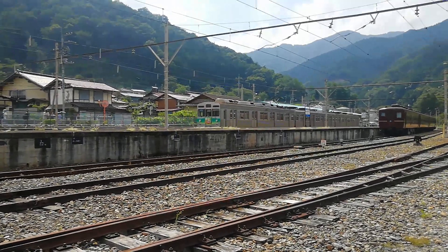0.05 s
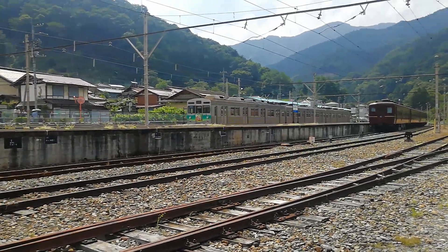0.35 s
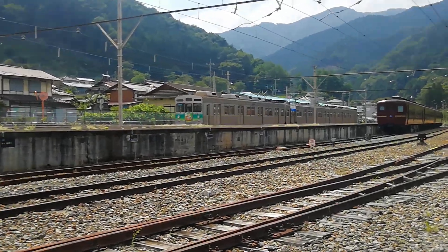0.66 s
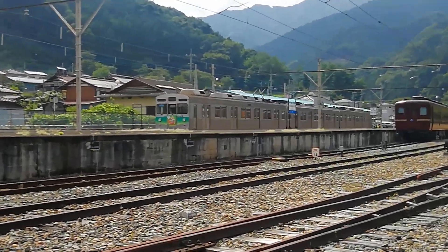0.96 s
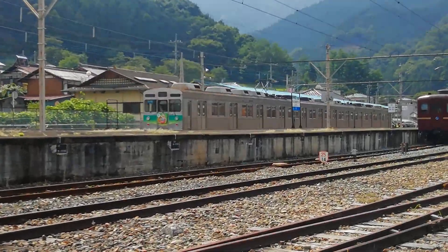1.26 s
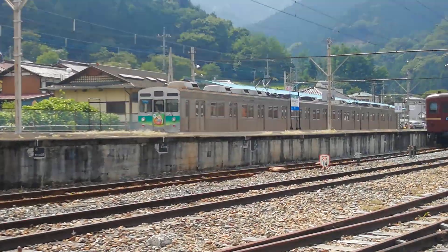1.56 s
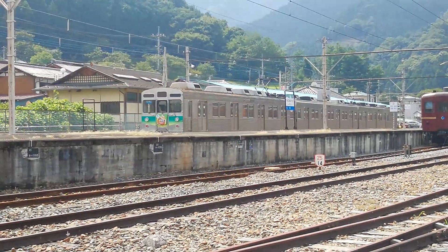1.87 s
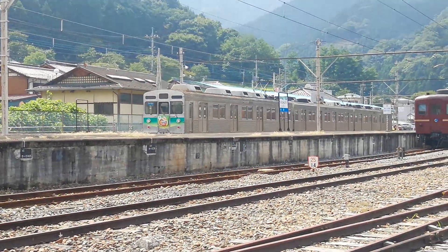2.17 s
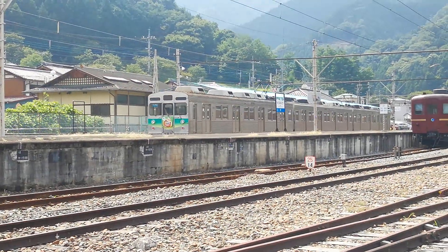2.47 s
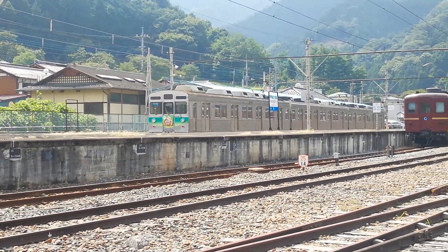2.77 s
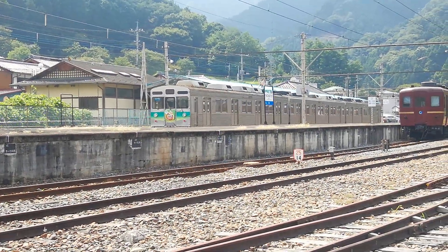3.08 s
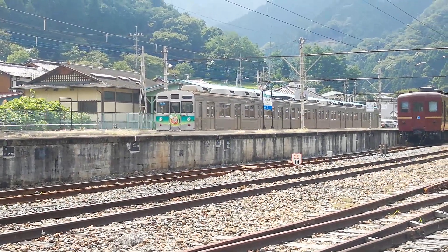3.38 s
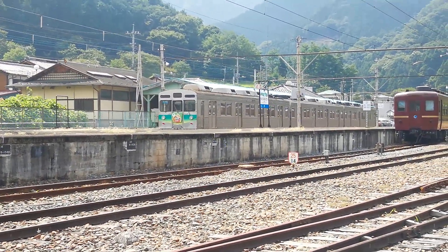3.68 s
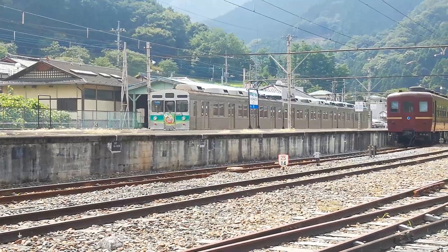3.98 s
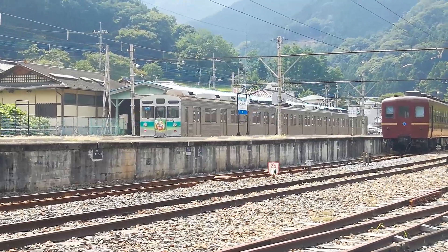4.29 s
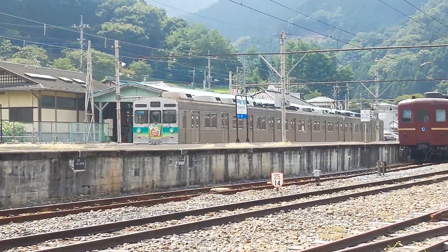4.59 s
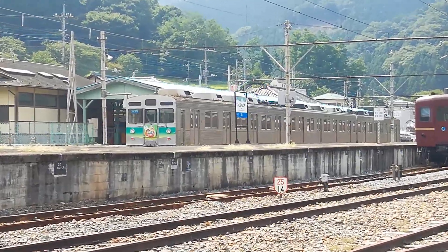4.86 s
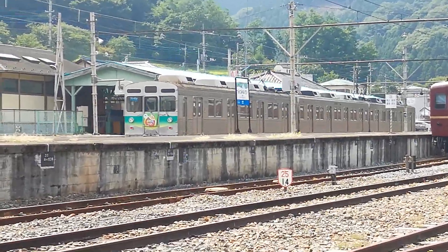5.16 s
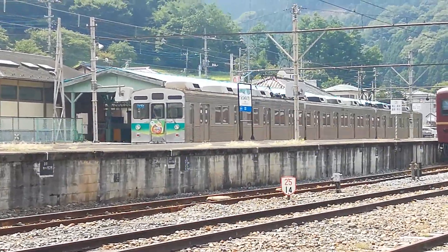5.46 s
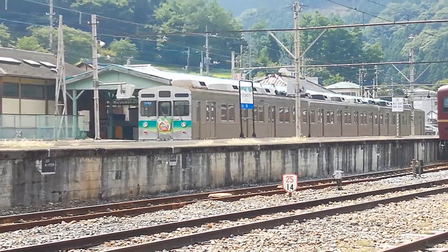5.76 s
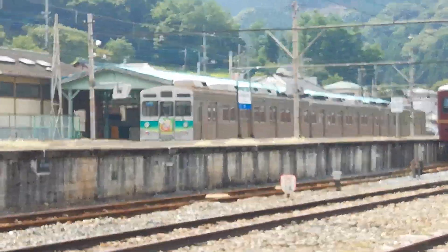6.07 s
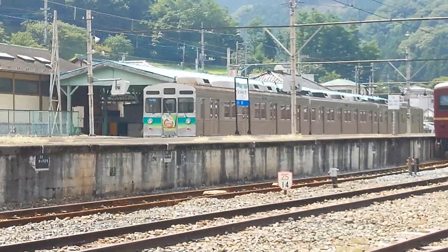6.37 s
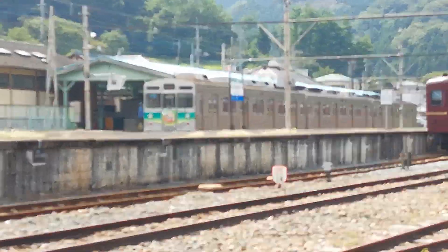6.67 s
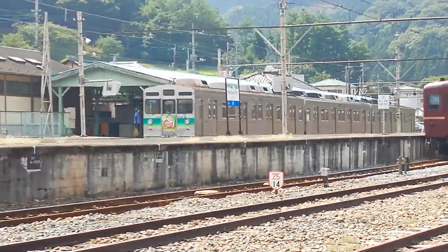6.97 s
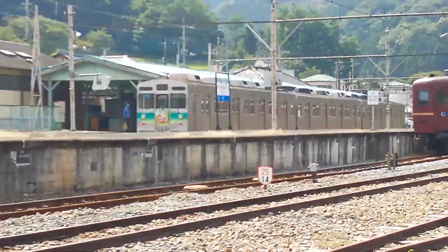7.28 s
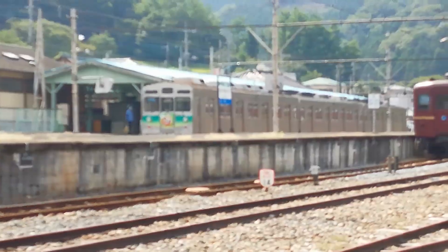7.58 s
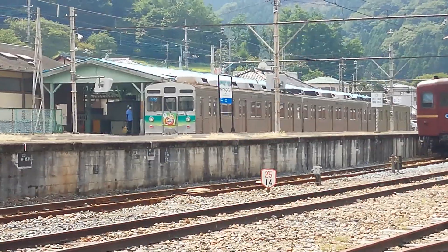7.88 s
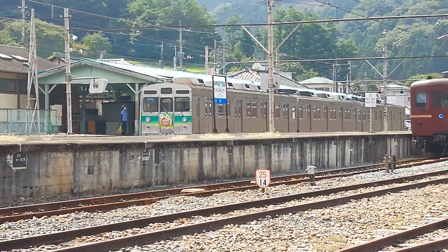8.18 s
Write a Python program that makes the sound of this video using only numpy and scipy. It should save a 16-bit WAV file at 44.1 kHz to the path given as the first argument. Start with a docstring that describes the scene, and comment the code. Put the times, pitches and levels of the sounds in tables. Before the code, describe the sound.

An electric train idles at a country platform, heard from across the tracks. Its deep, steady hum dominates, with a soft whir, a thin whine and rushing cooling air. Faint cicadas buzz and call in short phrases from the trees. A light breeze rumble dies down while three tiny ticks sound close by, followed by one dry click of a stone. The whine and high insect shimmer grow slightly toward the end.

```python
"""An electric train idles across the tracks at a country platform on a summer day. From the start its
motor-generator hums and whirs over rushing cooling air, a low drone swells and sinks, and cicadas click
their tymbals into song in the trees. A soft scuff comes at 1 s, then three tiny close ticks at 1.3, 3.7
and 5.2 s, while the breeze and its rumble die down. At 6 s a stone shifts in the ballast. Toward the end
a whine stands out more, a high insect chorus grows and, at 8.1 s, something rustles faintly."""
import sys
import numpy as np
from scipy import signal
from scipy.fft import rfft, irfft
from scipy.io import wavfile

SR = 44100
rng = np.random.default_rng(int(sys.argv[2]) if len(sys.argv) > 2 else 0)


def store_wav(level_fs):
    """Save 16-bit WAV to argv[1]."""
    pcm = np.round(np.clip(np.atleast_2d(level_fs), -1, 1) * 32767)
    wavfile.write(sys.argv[1], SR, pcm.T.astype(np.int16))


N = 372204
TIME = np.arange(N) / SR
BINS = np.maximum(np.fft.rfftfreq(N, 1 / SR), 1)
SPLIT = np.array([[.5], [-.5]])   # shares a left-right difference between the channels


def from_db(db):
    """Decibels to gain."""
    return 10 ** (np.asarray(db) / 20)


def in_time(rows):
    """An automation curve at every sample."""
    return np.interp(TIME, *np.transpose(rows))


def at_hz(points, hz, edge_db=0):
    """The columns of a spectrum on a log-frequency axis, falling by edge_db an octave past its ends."""
    known, *columns = np.transpose(points)
    octave, known = np.log2(hz), np.log2(known)
    outside = np.abs(octave - np.clip(octave, known[0], known[-1]))
    return np.array([np.interp(octave, known, c) - edge_db * outside for c in columns])


def rms_one(x):
    """Scale to unit rms."""
    return x / np.sqrt(np.mean(x ** 2) + 1e-20)


def drift(rate_hz):
    """Random wander of spread 1, smooth above rate_hz."""
    return rms_one(irfft(rfft(rng.standard_normal(N)) / (1 + (BINS / rate_hz) ** 4), N))


def shifted(wander):
    """The same wander from a random starting point."""
    return np.roll(wander, rng.integers(N))


def phase_of(hz):
    """Running phase of a moving pitch, in radians."""
    return 2 * np.pi * np.cumsum(hz) / SR


def pan(left_db):
    """Channel gains that put the left left_db above the right."""
    return from_db(SPLIT * left_db)


def swell(start, length):
    """A half-sine fade in and out."""
    return np.sin(np.pi * np.clip((TIME - start) / length, 0, 1))


def struck(modes):
    """The short ring after one touch, from modes (frequency [Hz], gain, t60 [s])."""
    age = np.arange(SR // 50) / SR
    return sum((-1) ** k * gain * from_db(-60 * age / t60) * np.sin(2 * np.pi * hz * age)
               for k, (hz, gain, t60) in enumerate(modes))


def add(out, s, sound):
    """Mix a short sound in at a given time."""
    at = round(s * SR)
    out[..., at:at + sound.shape[-1]] += sound


# Stereo image of the open air: (frequency [Hz], likeness of the channels [0-1])
AIR_LIKENESS = [(60, 1), (140, 0.9), (210, 1), (330, 0.72), (500, 0.13), (800, 0.08), (1200, 0.5),
                (1800, 0), (16000, 0)]
def open_air(density_db):
    """Diffuse noise: near mono in the bass, fully wide in the treble."""
    mid, side = rfft(rng.standard_normal((2, N))) * np.sqrt(SR) / 2
    alike = at_hz(AIR_LIKENESS, BINS)
    stereo = np.sqrt(1 + alike) * mid + np.sqrt(1 - alike) * side * [[1], [-1]]
    return irfft(stereo * from_db(density_db), N)


# Hiss bed before trim: (frequency [Hz], left density [dB/Hz], right density [dB/Hz])
HILLSIDE_EQ = [(3080, -99, -93.5), (3200, -99.5, -100), (3990, -92, -96.5), (4660, -91, -89),
               (4980, -93, -88), (5400, -97, -92), (5600, -98.5, -97), (6940, -95, -93.5),
               (7900, -103, -101), (9600, -110, -109), (12000, -112, -110), (12800, -111, -105),
               (13700, -107, -101), (15500, -106, -99.5)]
def hillside(trim_db=.66, flutter_db=.67):
    """A wooded hillside full of far insects blurs into a fluttering hiss."""
    return from_db(trim_db + flutter_db * drift(6.3)) * open_air(at_hz(HILLSIDE_EQ, BINS, edge_db=7))


# Fader of the insect chorus, slowly rising: (time [s], level [dB])
CHORUS_FADER = [(0, -71.5), (1.6, -73), (3.2, -70.5), (5.0, -71), (6.9, -68.5), (8.44, -66.5)]
# Its colour: (frequency [Hz], relative level [dB])
CHORUS_EQ = [(7000, 3), (8100, -1), (9500, -14), (11800, -8), (13000, -12), (14000, 4.5), (15000, -12)]
def far_chorus(left_db=-9, shimmer_db=2.5):
    """Many small insects merge into a high shimmer on the right."""
    level = from_db(in_time(CHORUS_FADER) + shimmer_db * drift(26))
    return level * pan(left_db) * rms_one(open_air(at_hz(CHORUS_EQ, BINS, edge_db=40)))


# Band-noise swells: (start [s], length [s], centre [Hz], width [octaves], peak level [dB])
SWELL_CUES = [(1.058, .03, 800, .9, -53.5), (1.08, .065, 700, .95, -54.5), (5.0, 5, 1450, .35, -64.5),
              (8.1, .5, 1650, .42, -57.7), (-.6, 1.8, 850, .3, -64)]
def noise_swells():
    """The train's airy rush swells softly, lower-pitched at the start and higher from 5 s;
    short swells make a double scuff at 1 s and a faint rustle at 8.1 s."""
    out = 0
    for start, length, hz, width, db in SWELL_CUES:
        band_db = -5 * (np.log2(BINS / hz) / width) ** 2
        out += from_db(db) * swell(start, length) * rms_one(open_air(band_db))
    return out


# Ride of a light breeze that drops: (time [s], gain [dB])
BREEZE_FADER = [(0, 5.5), (.7, 2), (2.8, 1.5), (4.4, -2), (5.3, -5), (8.44, -5)]
# Low end before that ride: (frequency [Hz], density [dB/Hz])
RUMBLE_EQ = [(12, -78), (24, -73), (31, -62.5), (41, -65), (57, -62), (72, -67), (100, -74)]
def rumble(gust_db=1.5):
    """A low rumble comes and goes on the breeze."""
    level = from_db(in_time(BREEZE_FADER) - gust_db * drift(2.4))
    return level * open_air(at_hz(RUMBLE_EQ, BINS, edge_db=27))


# Ring of a ballast stone: (frequency [Hz], level [dB], t60 [s])
STONE_MODES = [(2900, -35, .003), (4000, -31.5, .0025), (5000, -32, .0025)]
def stone(at_s=6.0485, right_lead_s=.0004, grit_s=.012, grit_db=-9):
    """A stone shifts: one dry click off to the right, then a brief spatter of grit."""
    out = np.zeros((2, N))
    ring = struck([(hz, from_db(db), t60) for hz, db, t60 in STONE_MODES])
    for channel, s in zip(out, (at_s, at_s - right_lead_s)):
        add(channel, s, ring)
        for delay in rng.uniform(0, grit_s, size=6):
            add(channel, s + delay, from_db(grit_db) * ring)
    return out


# Ring of a small plastic case: (frequency [Hz], left gain [dB], right gain [dB], t60 [s])
CASE_MODES = [(3450, -8, -16, .0035), (3900, -7.5, -18, .0034), (4800, -3.5, -15.5, .0037),
              (5720, -11, -10.5, .0047), (7380, -0.5, -17, .0058), (9610, 6, -17, .0028),
              (10170, -1, -17, .0028), (13500, -1, -14, .0007), (15450, -6, -17, .0012)]
# Tick cues: (time [s], gain [dB], dull above [Hz], slip [dB re landing], bounce delay [s],
# bounce [dB re landing])
TICK_CUES = [(1.3443, -22, 9000, -2, .00112, -8.5), (3.7371, -23, 30000, -2, .00093, -11),
             (5.2091, -25.5, 8900, 3, .00094, -9)]
def ticks(landing_s=.00045):
    """A tiny catch slips, lands and bounces against the case, close on the left."""
    out = np.zeros((2, N))
    for s, gain_db, dull_hz, slip_db, bounce_s, bounce_db in TICK_CUES:
        ring = struck([(hz, from_db([[left_db], [right_db]]) / (1 + (hz / dull_hz) ** 3), t60)
                       for hz, left_db, right_db, t60 in CASE_MODES])
        for delay, touch_db in [(0, slip_db), (landing_s, 0), (bounce_s, bounce_db)]:
            add(out, round(s * SR) / SR + delay, from_db(gain_db + touch_db) * ring)
    return out


TREE_DELAY_S = np.array([[.00023], [0]])   # the cicadas reach the left channel later
# Left-right balance of the cicadas' sound, varying with pitch: (frequency [Hz], left minus right [dB])
CICADA_BALANCE = [(3900, 1), (4130, 7), (4500, 5), (4750, 0), (5000, -3), (5250, -9), (5600, -13), (5980, -2),
                  (6400, 0), (6800, -6), (7400, -9), (8600, -4), (14000, -7)]
# Body resonances of a buzzing cicada: (frequency [Hz], relative gain [dB])
BODY_EQ = [(4400, -12), (4970, 0), (5200, 0), (5580, -1), (5800, -5), (5980, 3), (6190, -11), (6380, 4.5),
           (6600, -9), (6770, -2), (7030, -13), (7420, -5), (8200, -15), (8650, -10), (9300, -24),
           (12400, -24), (14000, -7), (15800, -8)]
def tymbal(pulse_hz, scatter=.21):
    """Rapid clicks ring an insect's body; leaves scatter a share of the power into hiss."""
    pulses = np.exp(200 * (np.cos(phase_of(pulse_hz)) - 1))
    clicks = np.diff(pulses, 2, prepend=[0, 0])
    body_db = at_hz(BODY_EQ, BINS, edge_db=40) + SPLIT * at_hz(CICADA_BALANCE, BINS)
    delay = np.exp(-2j * np.pi * BINS * TREE_DELAY_S)
    direct = rms_one(irfft(rfft(clicks) * from_db(body_db) * delay, N))
    return np.sqrt(1 - scatter) * direct + np.sqrt(scatter) * rms_one(open_air(body_db))


# One unbroken buzz per cicada: (click rate [Hz], throb rate [Hz], base level [dB])
BUZZ_VOICES = [(398.7, 19.0, -65.5), (413.5, 19.4, -73), (375.3, 18.4, -78)]
# How hard they all buzz: (time [s], gain [dB])
BUZZ_FADER = [(0, 0), (1.5, 1), (3.4, 2), (4.3, -1), (8.44, -1)]
def buzzing_cicadas(bend=.004, wander=.0012):
    """Thin steady buzzes, each throbbing in strength and pitch as the abdomen pumps."""
    out = 0
    for pulse_hz, throb_hz, level_db in BUZZ_VOICES:
        pump = np.sin(phase_of(throb_hz + .18 * drift(1)))
        buzz = tymbal(pulse_hz * (1 + bend * pump + wander * drift(2)))
        out += from_db(level_db + in_time(BUZZ_FADER)) * (1 + pump) * buzz
    return out


# Phrases of the lead cicada: (start [s], length [s], level before trim [dB], click rate [Hz],
# its climb [Hz/s], body resonance [Hz])
CALL_PHRASES = [(.02, .4, -63, 405, 5, 4500), (.42, 1.6, -67.5, 401, 0, 4500),
                (2.58, .76, -58.8, 390, 46, 4400), (3.42, .31, -62, 391, 10, 4450),
                (3.95, .29, -61, 405, 10, 4450), (4.46, .42, -64.5, 390, 0, 4350),
                (5.9, .4, -64, 405, 30, 4600), (6.58, .54, -61.5, 398, 45, 4550),
                (7.26, .42, -66, 410, 10, 4700), (7.84, .4, -65.5, 410, 5, 4700)]
def calling_cicada(trim_db=1, rough=.0032, throb=.35, throb_hz=19, body_width_hz=600, scatter=.25):
    """As the muscle tightens, click rate and body resonance climb; leaves scatter some hiss."""
    starts, _, _, start_hz, climb, body_hz = np.transpose(CALL_PHRASES)
    phrase = np.maximum(np.searchsorted(starts, TIME) - 1, 0)
    tension = 1 + climb[phrase] * (TIME - starts[phrase]) / start_hz[phrase]
    pulse_hz = start_hz[phrase] * tension * (1 + rough * drift(40))
    centre_hz = body_hz[phrase] * tension ** 1.9   # the body stiffens
    cycle = phase_of(pulse_hz) - 2 * np.pi * pulse_hz * TREE_DELAY_S
    leaves_db = 3 * drift(12)   # leaves fade each partial in and out
    song = 0
    for k in np.arange(9.5, 13.6, .5):   # two unequal tymbals alternate, adding half harmonics
        body = 1 / (1 + ((k * pulse_hz - centre_hz) / body_width_hz) ** 4)
        level = body * from_db((-5 if k % 1 else 0) + shifted(leaves_db))
        partial = np.cos(k * cycle + rng.uniform(0, 2 * np.pi))
        song += level * pan(at_hz(CICADA_BALANCE, k * pulse_hz)) * partial
    pump = 1 + throb * np.sin(phase_of(throb_hz + 2 * drift(1.24)))
    effort = sum(from_db(db + trim_db) * swell(s, length) for s, length, db, *_ in CALL_PHRASES)
    ringing = phase_of(centre_hz)
    hiss = np.array([drift(body_width_hz) * np.cos(ringing) + drift(body_width_hz) * np.sin(ringing)
                     for _ in range(2)])
    return effort * pump * (np.sqrt(1 - scatter) * rms_one(song) + np.sqrt(scatter) * hiss)


# Swells added to the drone's resting level: (start [s], length [s], peak level [dB])
DRONE_CUES = [(-.1, 0.87, -60), (.97, 0.5, -57.5), (1.68, 0.37, -56), (1.98, 0.27, -56.5),
              (2.355, 0.86, -51.5), (4.203, 0.33, -62.5), (6.098, 0.55, -55), (7.84, 0.35, -55.5)]
def drone(hz=230.3, wander_hz=.51, rest_db=-65):
    """A lone low tone, unsteady in pitch, that swells and sinks back."""
    level = from_db(rest_db) + sum(from_db(db) * swell(s, length) ** 2 for s, length, db in DRONE_CUES)
    return np.sqrt(2) * level * np.sin(phase_of(hz + wander_hz * drift(2.6)))


# Air bed before trim and breeze: (frequency [Hz], left density [dB/Hz], right density [dB/Hz])
COOLING_EQ = [(50, -72.5, -85), (116, -72, -75.5), (142, -76, -76.5), (173, -73.5, -73.5), (210, -82, -80),
              (266, -78, -80.5), (324, -87, -83.5), (429, -93, -90.5), (534, -94.5, -95.5), (864, -94, -91),
              (994, -97.5, -96.5), (1210, -86.5, -89.5), (1690, -92, -97.5), (2000, -92, -93.5),
              (2480, -100, -92)]
def cooling_air(trim_db=.7, breeze_share=.34, flutter_db=.67):
    """The rush of the train's cooling air, carried over on the breeze."""
    level = from_db(trim_db + breeze_share * in_time(BREEZE_FADER) + flutter_db * drift(6.6))
    return level * open_air(at_hz(COOLING_EQ, BINS, edge_db=39))


SHAFT_HZ, FAN_HZ, SLOT_HZ = 15.786, 347.3, 1294
def shaft_tone(turns, hz, level_db, right_lead_s=0):
    """A sine at an rms level, on the multiple of the shaft speed nearest to hz."""
    phase = rng.uniform(0, 2 * np.pi) - SPLIT * 2 * np.pi * hz * right_lead_s
    return np.sqrt(2) * from_db(level_db) * np.sin(2 * np.pi * round(hz / SHAFT_HZ) * turns + phase)


# Colour of the whir: (frequency [Hz], level per harmonic [dB])
WHIR_EQ = [(100, -74), (180, -74), (300, -78), (400, -86), (500, -91), (780, -84), (1030, -87), (1250, -83),
           (1650, -85), (1900, -83), (2150, -86), (2500, -86), (3200, -93)]
def whir(turns, size=4096):
    """Brushes and bearings repeat the same rough pattern on each turn of the shaft."""
    orders = np.arange(1, size // 2)
    hz = orders * SHAFT_HZ
    tones_hz = [row[0] for row in HUM_PARTIALS + WHINE_PARTIALS] + [FAN_HZ, SLOT_HZ]
    free = ~np.isin(orders, [round(tone / SHAFT_HZ) for tone in tones_hz])   # fill in between the tones
    gains = free * from_db(at_hz(WHIR_EQ, hz, edge_db=21))
    width = 1 - at_hz(AIR_LIKENESS, hz)
    phases = rng.uniform(0, 2 * np.pi, len(hz)) + width * rng.uniform(-np.pi, np.pi, (2, len(hz)))
    spectrum = np.pad(gains * np.exp(1j * phases), ((0, 0), (1, 1)))
    one_turn = irfft(spectrum) * size / np.sqrt(2)
    return np.array([np.interp(turns * size, np.arange(size), side, period=size) for side in one_turn])


# Weaker whines of slots and fan blades: (frequency [Hz], level [dB], left minus right [dB])
WHINE_PARTIALS = [(710, -82, -6), (789, -79, -1), (805, -75, -4), (821, -81, -7), (916, -78.5, -5),
                  (973, -80, -5), (1089, -79.5, 4), (1152, -75, 3), (1168, -71.5, 3), (1200, -73.5, 3),
                  (1231, -73, -1), (1279, -75.5, -1), (1389, -79, 3), (1437, -74, 5), (1500, -75, 9),
                  (1579, -80, 12), (1594, -80, 5), (1863, -80, 4), (1910, -80.5, 0), (1957, -77.5, -6),
                  (2052, -81, 0), (2115, -82, 0)]
# Fader of the strongest whine, which grows: (time [s], level [dB])
SLOT_FADER = [(0, -70), (3.5, -69), (5.8, -65.3), (8.44, -66.3)]
# Fader of the cooling fan's thin tone: (time [s], level [dB])
FAN_FADER = [(0, -65), (3.1, -65), (4.6, -68.5), (8.44, -69)]
def whine(turns, gust, waver_db=1, right_lead_s=.0001):
    """Passing slots and fan blades sing; moving air makes all but the fan's lowest tone waver."""
    weak = sum(pan(left_db) * shaft_tone(turns, hz, db + waver_db * shifted(gust), right_lead_s)
               for hz, db, left_db in WHINE_PARTIALS)
    slot_db = in_time(SLOT_FADER) + waver_db * gust
    slot = pan(left_db=2.5) * shaft_tone(turns, SLOT_HZ, slot_db, right_lead_s)
    return weak + slot + shaft_tone(turns, FAN_HZ, in_time(FAN_FADER))


# Partials of the magnetic hum: (frequency [Hz], base level [dB])
HUM_PARTIALS = [(94.7, -33.5), (110.5, -59), (126.3, -51.5), (142, -80), (158, -65), (189.5, -65),
                (221, -70.5), (237, -63.5), (252.6, -68.5), (268.4, -64.5), (284, -74)]
# How strongly it carries across the tracks: (time [s], gain [dB])
HUM_FADER = [(0, -2), (3.7, -1.3), (5.0, -1), (5.5, 0), (6.6, -0.6), (7.1, -1.3), (8.2, 0)]
def hum(turns, gust, waver_db=.48):
    """The deep magnetic hum, wavering slightly in the moving air."""
    carry_db = in_time(HUM_FADER)
    return sum(shaft_tone(turns, hz, db + carry_db + waver_db * shifted(gust))
               for hz, db in HUM_PARTIALS)


def motor_generator(wow=.0003):
    """Hum, whine and whir are all multiples of one slightly wandering shaft speed."""
    turns = np.cumsum(SHAFT_HZ * (1 + wow * drift(.83))) / SR
    gust = drift(2.9)
    return hum(turns, gust) + whine(turns, gust) + whir(turns)


def scene():
    """The idling train in front of the hillside and its insects, with small spot sounds on top."""
    insects = buzzing_cicadas() + calling_cicada() + far_chorus()
    train = motor_generator() + cooling_air()
    background = drone() + rumble() + hillside()
    return background + insects + train + ticks() + stone() + noise_swells()


def record(dry, cutoff_hz=15850):
    """A steep low-pass takes off the very top."""
    return signal.sosfilt(signal.ellip(12, .1, 80, cutoff_hz, fs=SR, output="sos"), dry)


dry = scene()
out = record(dry)
store_wav(out)
```